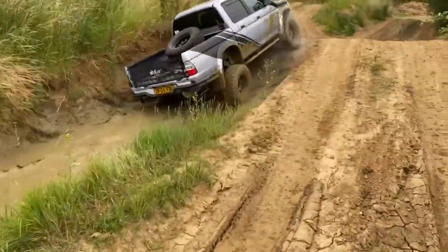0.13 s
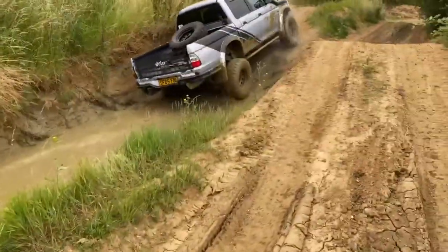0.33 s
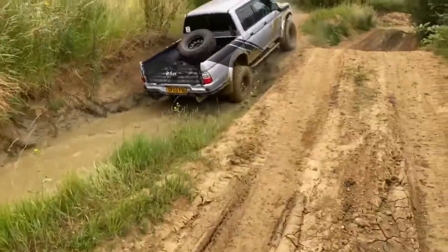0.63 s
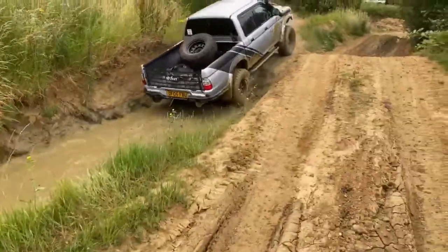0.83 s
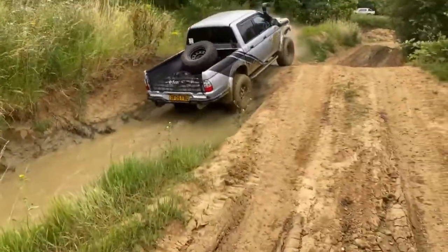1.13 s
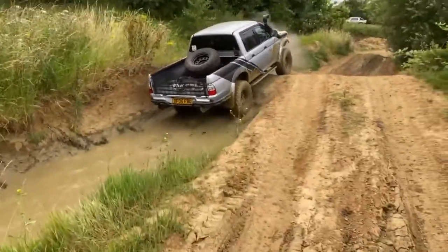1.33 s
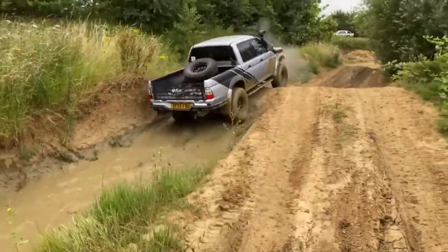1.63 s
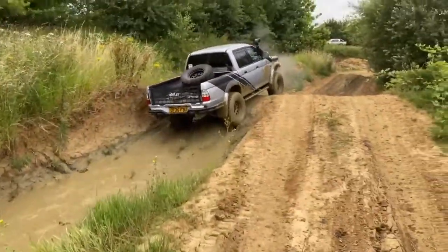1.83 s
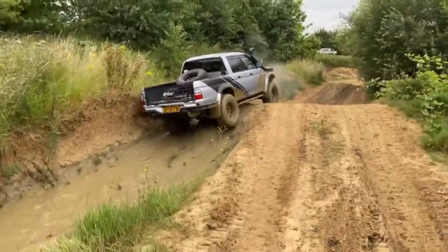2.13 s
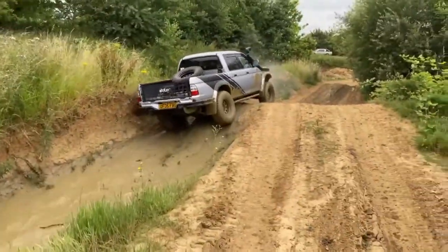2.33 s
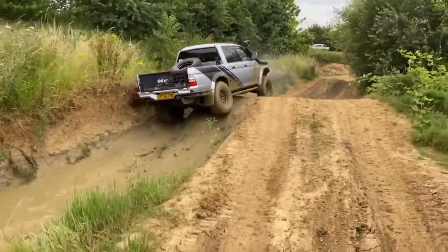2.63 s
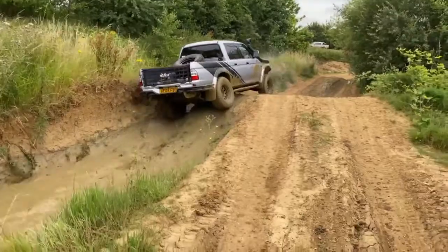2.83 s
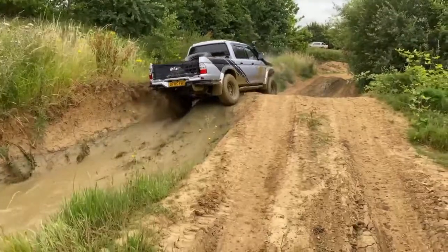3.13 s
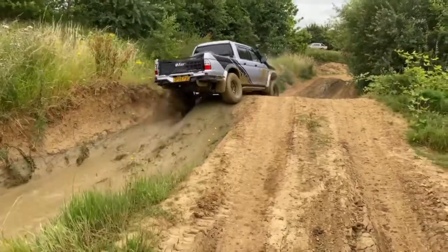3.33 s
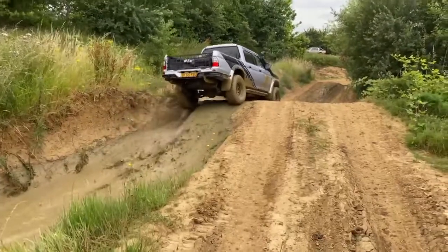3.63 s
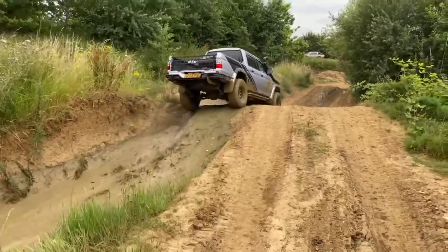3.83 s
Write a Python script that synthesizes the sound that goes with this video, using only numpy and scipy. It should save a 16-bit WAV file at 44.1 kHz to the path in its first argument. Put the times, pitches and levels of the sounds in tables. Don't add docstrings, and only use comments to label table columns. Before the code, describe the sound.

A pickup truck's deep, uneven exhaust throb surges, sags, then revs again while wheels hiss and rumble in a muddy rut; mud splats and wind buffets the outdoor microphone midway.

```python
import sys
import numpy as np
from scipy import signal
from scipy.fft import rfft, irfft
from scipy.io import wavfile
from scipy.ndimage import uniform_filter1d

SR = 44100
rng = np.random.default_rng(int(sys.argv[2]) if len(sys.argv) > 2 else 0)


def file_out(sig):
    cols = np.atleast_2d(sig).T
    lim = np.clip(cols, -1, 1)
    pcm = np.round(lim * 32767).astype(np.int16)
    wavfile.write(sys.argv[1], SR, pcm)


def undo_db(level):
    steps = np.asarray(level, float) / 20
    return 10 ** steps


N = 176400
OPPOSITE = np.array([[1], [-1]])


def rms_one(x):
    return x / np.sqrt(np.mean(x ** 2) + 1e-20)


def in_time(rows):
    seconds, *columns = np.transpose(rows)
    return [np.interp(np.arange(N) / SR, seconds, column) for column in columns]


def at_hz(points, hz):
    point_hz, point_db = np.transpose(points)
    return np.interp(np.log(hz), np.log(point_hz), point_db)


def drift(rate):
    every = 40
    r = np.exp(-2 * np.pi * rate * every / SR)
    noise = rng.standard_normal(N // every + 2002)
    slow = signal.lfilter([1], [1, -2 * r, r * r], noise)[2000:]
    return np.interp(np.arange(N) / every, np.arange(len(slow)), rms_one(slow))


def colour(x, points):
    hz = np.maximum(np.arange(N // 2 + 1) * SR / N, 1)
    octaves_below = np.maximum(np.log2(points[0][0] / hz), 0)
    return irfft(rfft(x) * undo_db(at_hz(points, hz) - 220 * octaves_below), N)


def resonance(x, hz, width_hz):
    r = np.exp(-np.pi * width_hz / SR)
    zeros = np.array([1, 0, -1]) * (1 - r * r) / 2
    return signal.lfilter(zeros, [1, -2 * r * np.cos(2 * np.pi * hz / SR), r * r], x)


def twice(x, hz, width_hz):
    return resonance(resonance(x, hz, width_hz), hz, width_hz)


def exhaust():
    # time in seconds, even throb (8th order) in dB, 5th order in dB, 3rd order in dB, bark in dB.
    engine = [(0, -23.5, -22, -38, -19), (.2, -17, -29.5, -36, -37), (.4, -20.5, -25, -38, -27.5),
              (.5, -12, -20.5, -34, -20), (.7, -10, -39, -24, -14.5), (.86, -10.5, -25, -31, -21),
              (1.0, -19, -27, -39, -25), (1.12, -42, -24, -36, -31), (1.35, -55, -20, -46, -29),
              (1.66, -29, -26.5, -48, -28), (2.1, -47, -47, -64, -45), (2.47, -26.5, -29, -41, -19.5),
              (2.66, -22, -21.5, -19, -15), (2.84, -22, -14, -31, -22), (3.08, -27.5, -26.5, -13, -21.5),
              (3.28, -40, -38, -21, -27.5), (3.52, -59, -31.5, -17, -25), (4.0, -53, -40, -37.5, -31.5)]
    # time in seconds, engine speed in cycles per second.
    speed = [(0, 15.0), (.17, 14.3), (.41, 13.85), (.58, 16.0), (.7, 16.95), (.84, 15.9), (1.0, 14.3),
             (1.2, 11.6), (1.4, 10.2), (1.66, 9.1), (1.9, 11.4), (2.46, 13.4), (2.6, 15.7), (2.85, 14.7),
             (3.06, 17.8), (3.28, 18.8), (3.52, 17.4), (4.0, 16.2)]
    bank_db = [-2, -14, -1, 0, -8, -1, -16, -11]
    # frequency in Hz, gain in dB.
    pipe = [(60, -13), (110, -4), (150, 6), (178, 0), (215, -0.5), (275, -5.5), (340, -25.5), (2000, -105)]
    # frequency in Hz, gain in dB.
    bright = [(190, -42), (230, 10), (320, 7), (390, -4), (480, -13.5), (600, -11.5), (900, -4.5),
              (2000, -59)]
    # frequency in Hz, width in Hz, gain in dB.
    bark_rings = [(178, 29.8, 1.96)]
    edge_rings = [(587, 50, 10.5), (324.4, 88, 0), (451, 96, 1.5)]
    wobble_db, wobble_rad, wobble_per_s = 1.2, .2, 5
    spread_rad = 3.3
    gate = .7
    clean_db, rough_db = -1, -11
    lumps_db, lumps_per_s = 3.2, 25
    edge_level_db, edge_follows = -21, 1.48
    edge_hangs_s = .1

    throb_db, fifth_db, third_db, bark_db = in_time(engine)
    cycle_hz = uniform_filter1d(in_time(speed)[0], size=SR // 12)
    phase = 2 * np.pi * np.cumsum(cycle_hz) / SR

    def tone(order):
        swell = undo_db(wobble_db * drift(wobble_per_s))
        offset = rng.uniform(0, spread_rad) + wobble_rad * drift(wobble_per_s)
        return swell * np.sin(order * phase + offset)

    low = np.sqrt(2) * (undo_db(throb_db) * tone(8) + undo_db(fifth_db) * tone(5) + undo_db(third_db) * tone(3))
    orders = sum(undo_db(bank_db[k % 8]) * tone(k) for k in range(9, 48))
    gas = rng.standard_normal(N) * (1 + gate * np.cos(8 * phase)) * (1 + gate * np.cos(3 * phase))

    def through(response):
        clean = undo_db(clean_db) * rms_one(colour(orders, response))
        return clean + undo_db(rough_db) * rms_one(colour(gas, response))

    def ringing(x, rings):
        return x + sum(undo_db(db) * twice(x, hz, width_hz) for hz, width_hz, db in rings)

    bark = ringing(through(pipe) * undo_db(lumps_db * drift(lumps_per_s)), bark_rings)
    edge = ringing(through(bright), edge_rings)
    hanging_db = np.maximum(throb_db, np.roll(throb_db, int(edge_hangs_s * SR)) - 1)
    edge_db = edge_level_db + edge_follows * np.maximum(hanging_db + 10.5, -22)
    return low + undo_db(bark_db) * rms_one(bark) + undo_db(edge_db) * rms_one(edge)


def churn():
    # time in seconds, level of wheels and fan in dB.
    churn_level = [(0, -30), (.3, -35), (.65, -33), (1.0, -35.5), (1.5, -35.5), (1.75, -36.5), (2.1, -36),
                   (2.5, -38.5), (2.9, -36), (3.2, -36.5), (3.5, -37.5), (4, -38.5)]
    # frequency in Hz, spectral density in dB per Hz.
    hiss = [(350, -12.5), (600, -6), (1700, -9.5), (2300, -6.5), (4000, -14.5), (7800, -24.5), (9100, -26),
            (11500, -26.5)]
    # frequency in Hz, width in Hz, level in dB.
    panels = [(655, 97, -14), (1448, 110, -18), (2026, 105, -14.5), (3950, 560, -23.5)]
    # frequency in Hz, left-right correlation from 0 to 1.
    likeness = [(60, 0.83), (170, 1), (500, 0.25), (1460, 0.41), (4230, 0), (12300, 0.24)]
    # frequency in Hz, left-right level difference in dB.
    lean_db = [(60, 0.0), (170, 3), (500, 6), (1460, -1.5), (4230, 4), (12300, 0)]
    # frequency in Hz, width in Hz, share removed.
    dips = [(1718, 45, 1), (2945, 810, 0.56)]
    grit_per_s, grit_db = 1500, -12

    hits = rng.random((2, N)) < grit_per_s / SR
    strength = undo_db(6.2 * np.minimum(rng.exponential(1, (2, N)), 5))
    grit = hits * strength * rng.choice([-1, 1], (2, N))
    white = rng.standard_normal((2, 2, N)) + undo_db(grit_db) * rms_one(grit)

    together_db = .7 * drift(3) + .8 * drift(20)
    out = 0
    borders = 330 * 2 ** np.arange(0, 5.4, 1 / 3)
    for k, (low, high) in enumerate(zip(borders, borders[1:])):
        band = signal.butter(2, [low, high], "band", fs=SR, output="sos")
        mid, side = signal.sosfilt(band, white[k % 2])
        hz = np.sqrt(low * high)
        alike = at_hz(likeness, hz)
        lean = undo_db(at_hz(lean_db, hz) / 2 * OPPOSITE)
        gain = undo_db(at_hz(hiss, hz) + together_db + 2.0 * drift(14.3))
        out = out + gain * lean * (np.sqrt(1 + alike) * mid + np.sqrt(1 - alike) * side * OPPOSITE)
    out = rms_one(out)

    for hz, width_hz, share in dips:
        out = out - share * resonance(out, hz, width_hz)
    drive = white[0, 0] + .7 * white[1]
    for hz, width_hz, db in panels:
        flutter_db = 2.0 * drift(1.3)
        out = out + undo_db(db + flutter_db) * rms_one(twice(drive, hz, width_hz))
    return undo_db(in_time(churn_level)[0] + 2.0) * out


def slaps():
    # start in seconds, level in dB, length in seconds, centre frequency in Hz.
    splashes = [(1.576, -25, 0.036, 4070), (1.598, -23, 0.033, 700), (1.642, -28.5, 0.051, 720),
                (1.613, -35, 0.13, 1470), (1.62, -34, 0.12, 1980), (2.102, -29, 0.033, 3750),
                (2.307, -24.5, 0.027, 2050), (2.5, -33, 0.27, 7100), (2.525, -28.5, 0.021, 10400),
                (2.977, -26.5, 0.024, 10100), (3.134, -28.5, 0.021, 1800), (3.17, -24.5, 0.048, 850)]
    out, t = np.zeros((2, N)), np.arange(N) / SR
    for start, db, length, hz in splashes:
        noise = rng.standard_normal((3, N))
        u = np.maximum(t - start, 0) / length
        splash = rms_one(resonance(noise[0] + .7 * noise[1:], hz, .5 * hz))
        out += undo_db(db) * 4 * u * np.exp(-3.0 * u) * splash
    return out


def ground():
    # frequency in Hz, gain in dB.
    rut = [(28, -34), (45, 8.5), (90, 7.5), (200, 2), (350, -21), (800, -55.5)]
    level_db = -29.5 + 2.5 * drift(4)
    return undo_db(level_db) * rms_one(colour(rng.standard_normal(N), rut))


def breeze():
    # time in seconds, level in dB.
    breeze_level = [(0, -68), (.7, -62), (1.35, -26.5), (1.7, -23.5), (1.82, -29), (2.08, -28),
                    (2.25, -20.5), (2.42, -16.5), (2.65, -21.5), (3.0, -17.5), (3.4, -39.5), (3.85, -24.5),
                    (4, -25)]
    # frequency in Hz, spectral density in dB per Hz.
    buffet = [(18, -47), (30, -5), (64, 14), (146, -3.5), (182, 3.5), (517, -25.5), (1000, -28),
              (1300, -81), (2200, -120)]
    # start in seconds, peak in dB, left-right level difference in dB.
    puffs = [(1.763, -15, -2), (2.085, -22.5, -1), (2.169, -22.5, 9), (2.199, -23.5, 13), (2.215, -14.5, 9),
             (2.226, -16, 7), (2.303, -20, 12), (2.327, -13, 9), (2.352, -19.5, -15), (2.373, -14, 9),
             (2.397, -14, 12), (2.431, -17, 8), (2.455, -16, 15), (2.521, -26.5, 11), (2.959, -19.5, 0)]
    breeze_apart, puff_apart = 1.1, .7
    puff_hz, t60_s, rise_s, puff_db = 420, .065, .001, 1.5
    pop = 6.0

    lumps = np.array([undo_db(3.5 * drift(18)) * rng.standard_normal(N) for _ in range(3)])
    out = undo_db(in_time(breeze_level)[0]) * rms_one(colour(lumps[0] + breeze_apart * lumps[1:], buffet))
    t = np.arange(4000) / SR
    dull = signal.butter(2, [100, puff_hz], "band", fs=SR, output="sos")
    for start, db, pan_db in puffs:
        noise = rng.standard_normal((3, len(t)))
        tail = (noise[0] + puff_apart * noise[1:]) * undo_db(-60 * t / t60_s) * (1 - np.exp(-t / rise_s))
        push = tail - pop * t / rise_s * np.exp(-3 * t / rise_s)
        puff = signal.sosfilt(dull, push)
        puff = puff / np.abs(puff).max(axis=1, keepdims=True)
        i = int(start * SR)
        out[:, i:i + len(t)] += undo_db(db + puff_db + pan_db / 2 * OPPOSITE) * puff
    return out


def scene():
    echo_s, echo_db = .006, -21
    lag = 3
    engine = exhaust() + ground()
    echo = undo_db(echo_db) * np.roll(engine, int(echo_s * SR)) * OPPOSITE
    truck = engine + echo + churn() + slaps()
    return np.array([truck[0], np.roll(truck[1], lag)]) + breeze()


def low_pass(x):
    return signal.sosfilt(signal.butter(12, 12870, fs=SR, output="sos"), x)


def record(dry):
    knee, room = .6, .3
    cut = signal.sosfilt(signal.butter(2, 30, "high", fs=SR, output="sos"), dry)
    over = np.maximum(np.abs(cut) - knee, 0)
    rounded = cut - np.sign(cut) * (over - room * np.tanh(over / room))
    mix = signal.sosfilt(signal.cheby2(20, 40, 12000, fs=SR, output="sos"), rounded)
    return low_pass(mix)


dry = scene()
out = record(dry)
file_out(out)
```